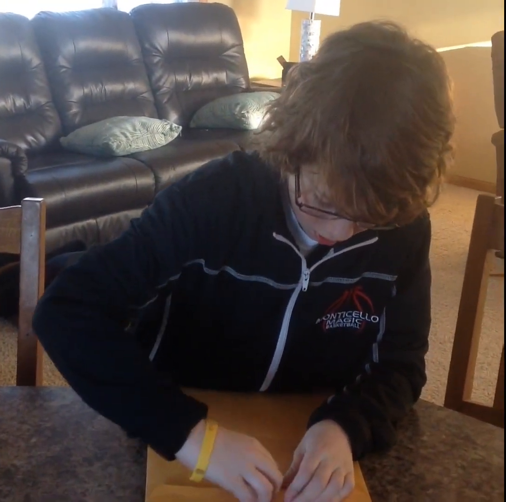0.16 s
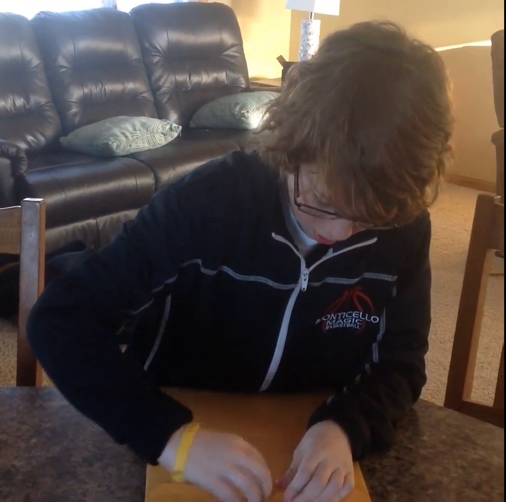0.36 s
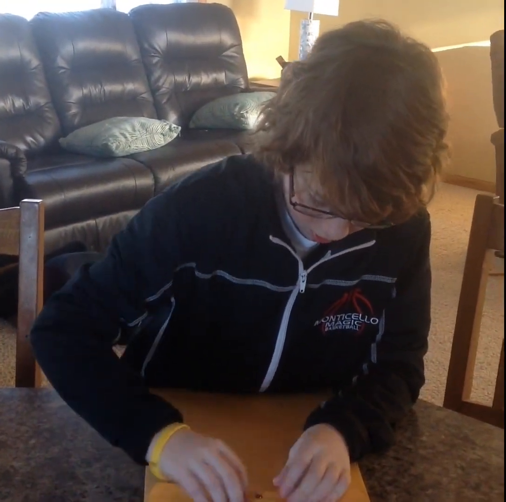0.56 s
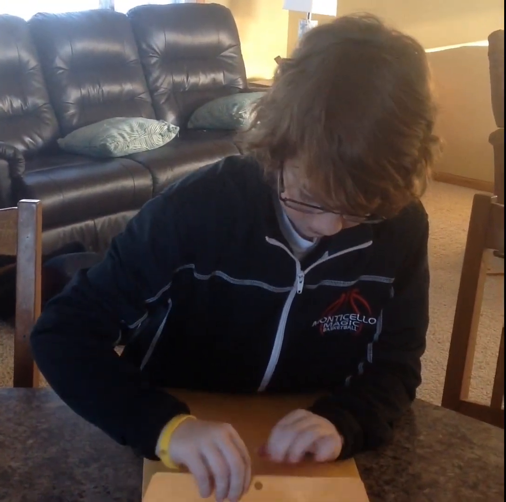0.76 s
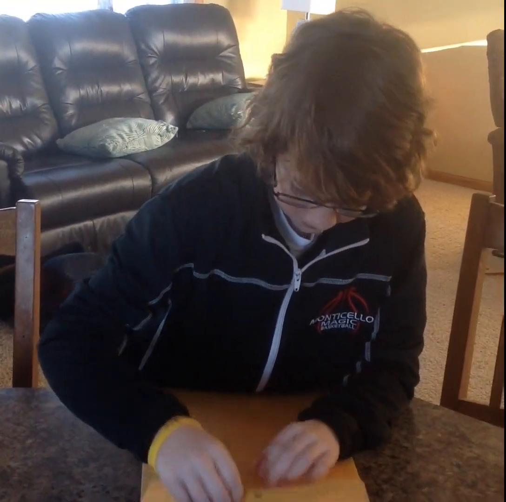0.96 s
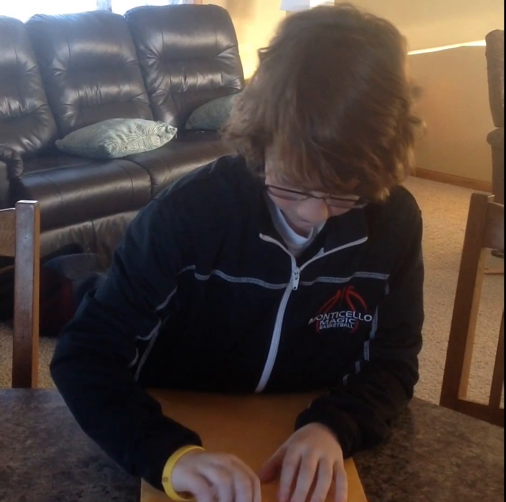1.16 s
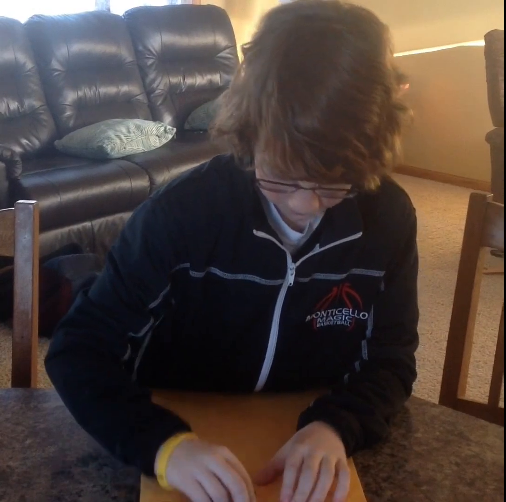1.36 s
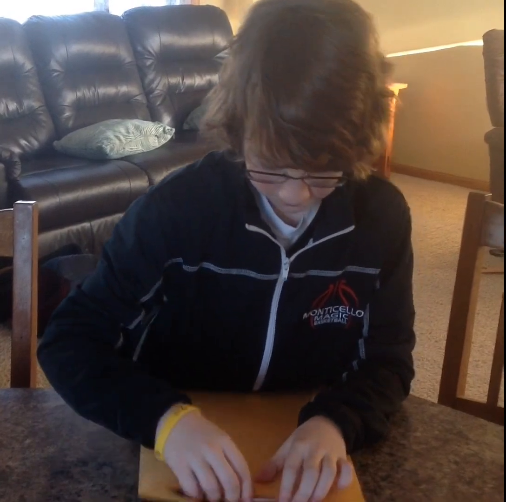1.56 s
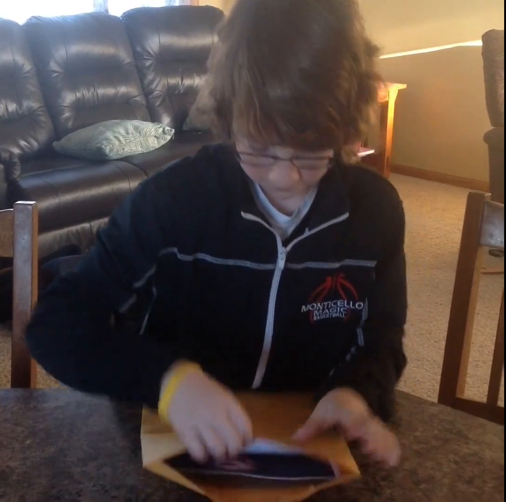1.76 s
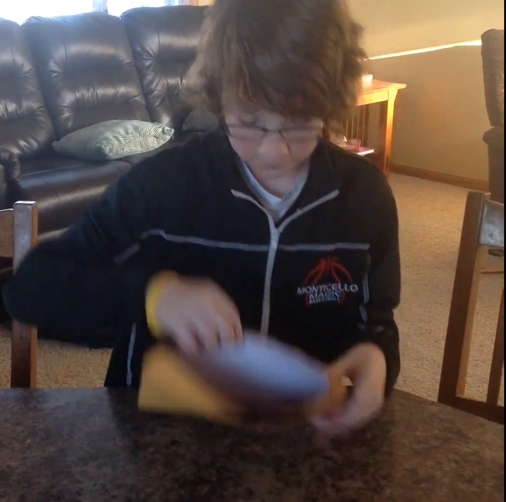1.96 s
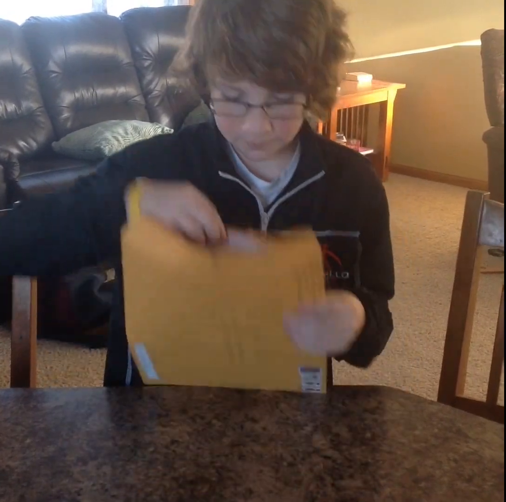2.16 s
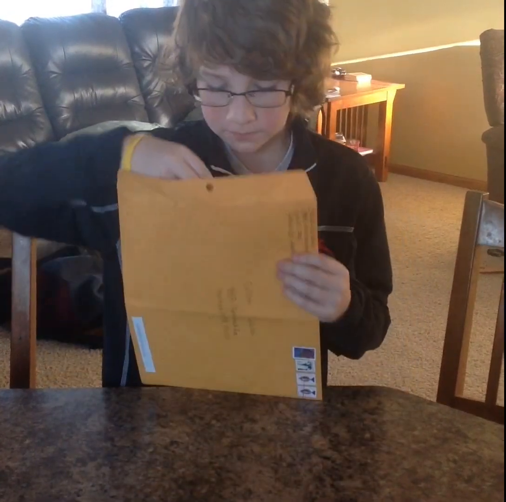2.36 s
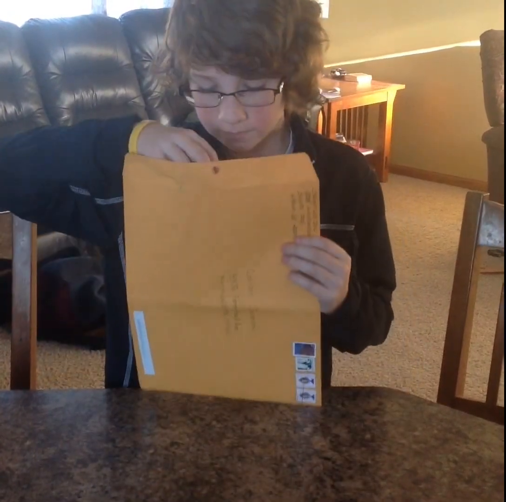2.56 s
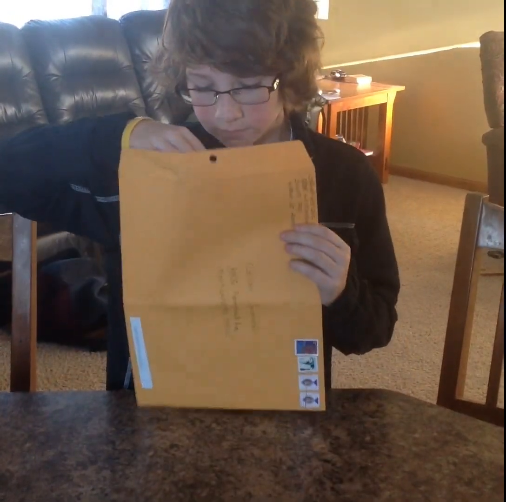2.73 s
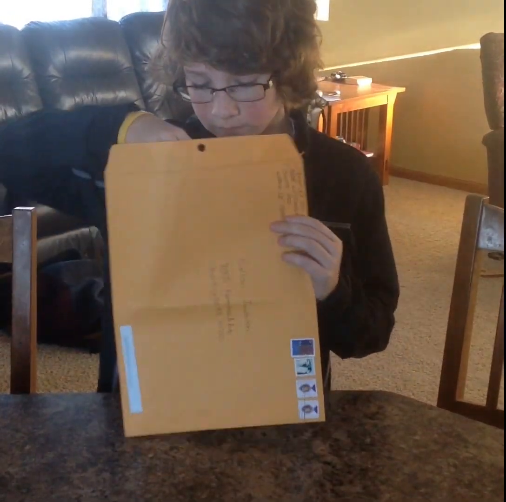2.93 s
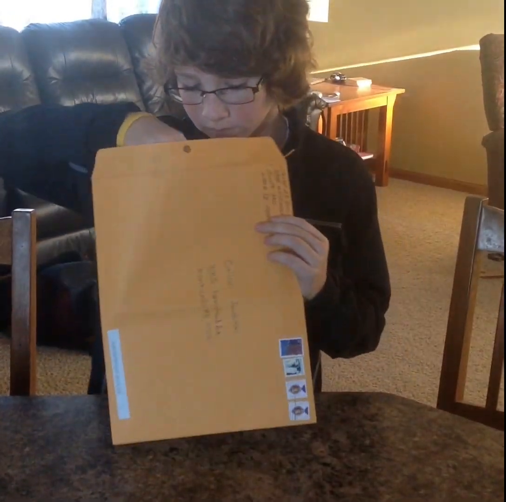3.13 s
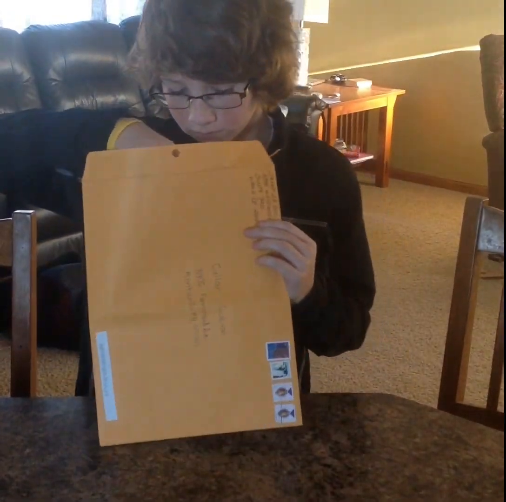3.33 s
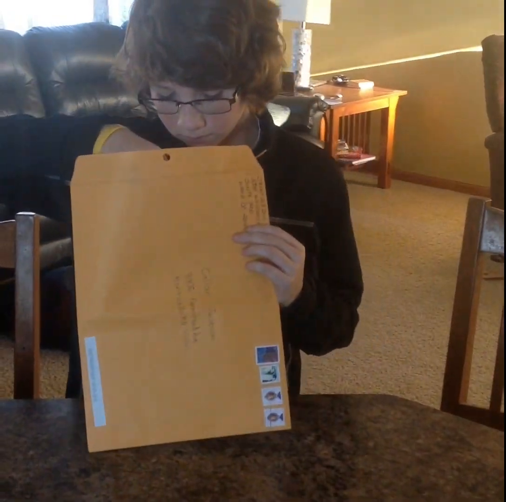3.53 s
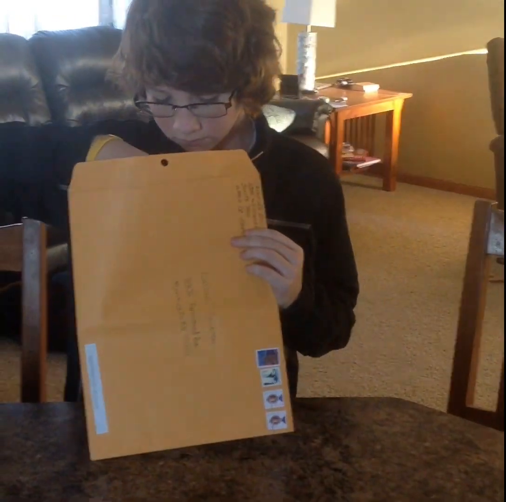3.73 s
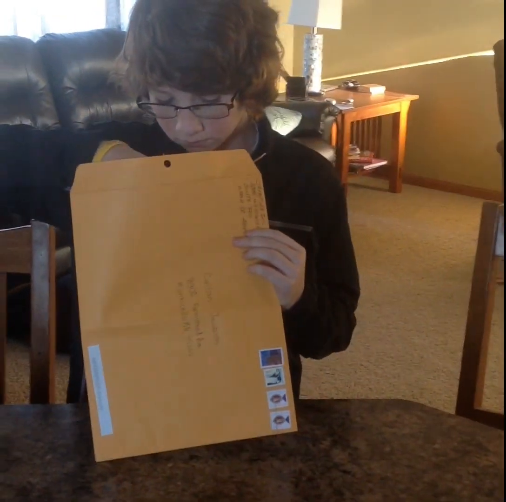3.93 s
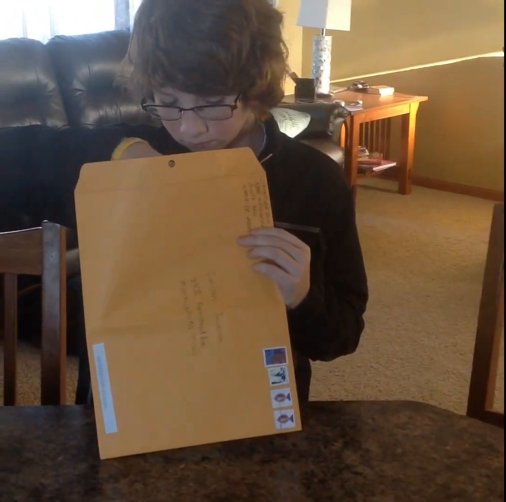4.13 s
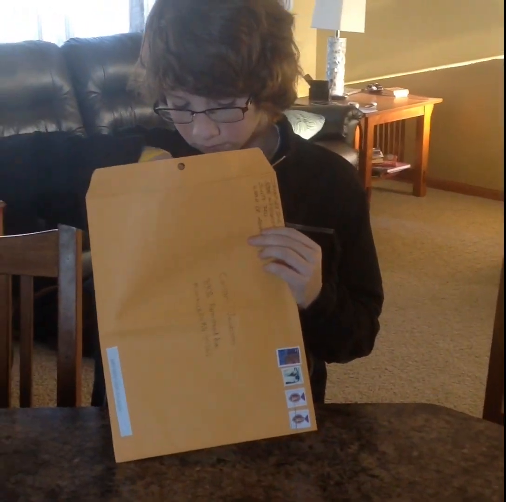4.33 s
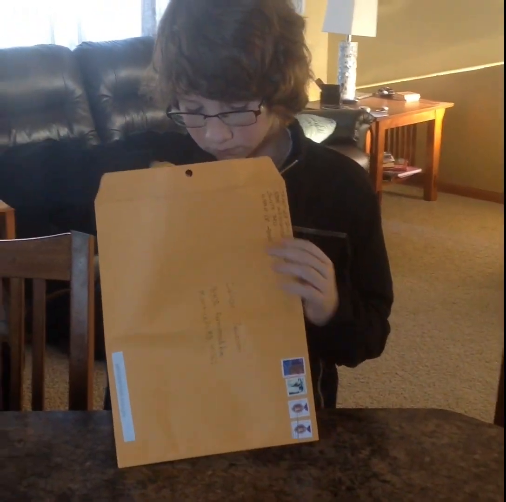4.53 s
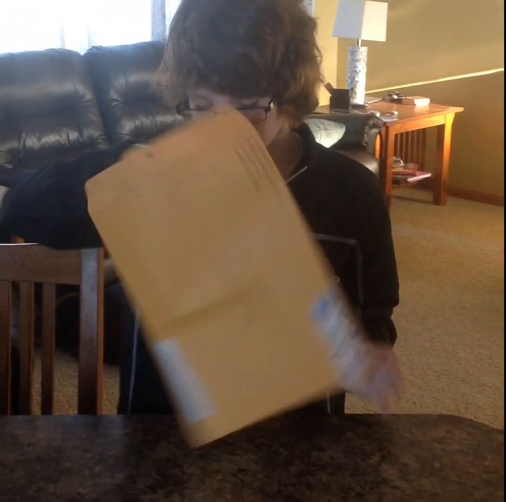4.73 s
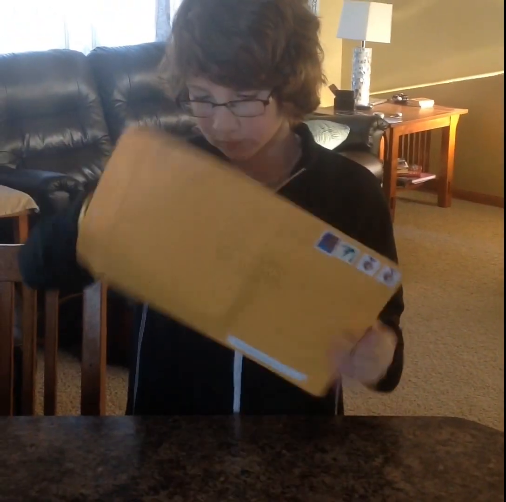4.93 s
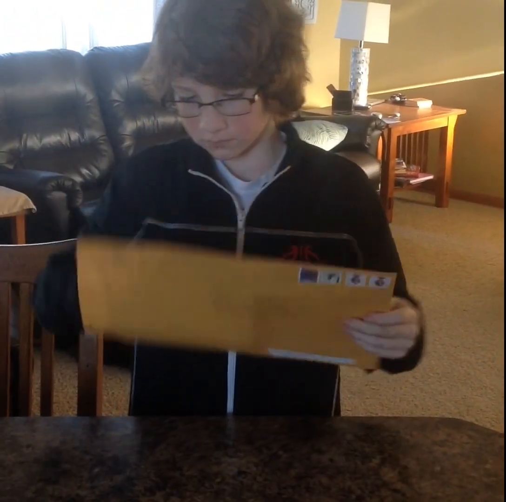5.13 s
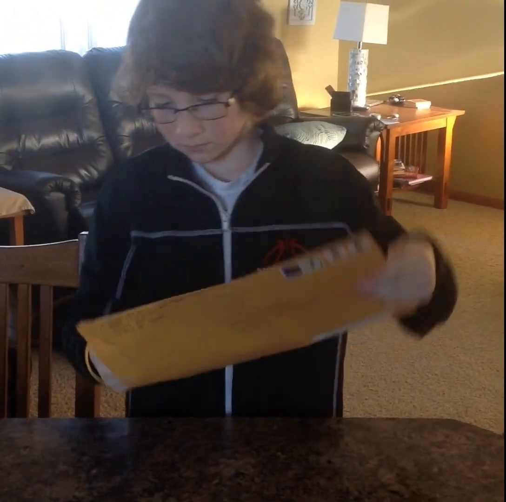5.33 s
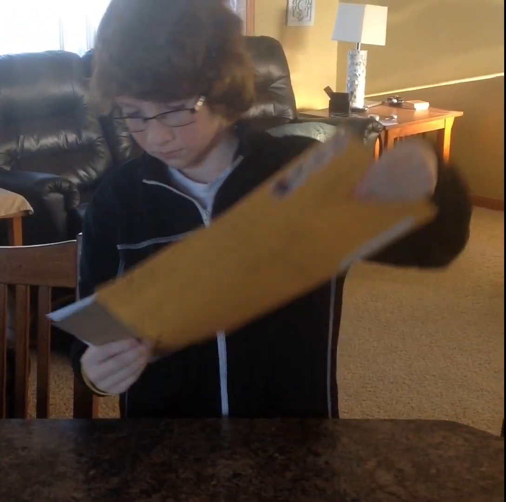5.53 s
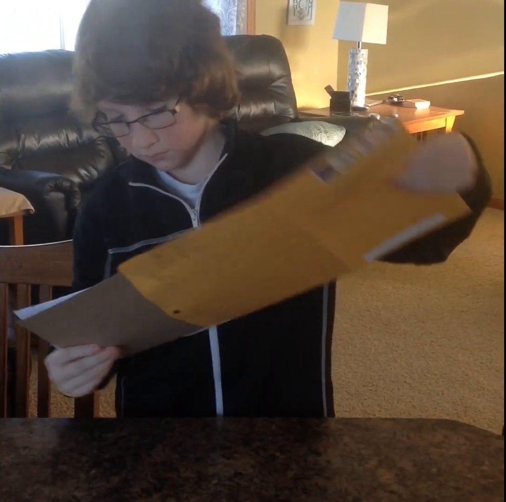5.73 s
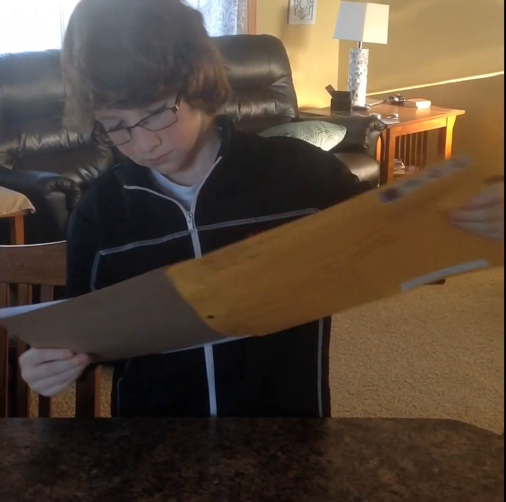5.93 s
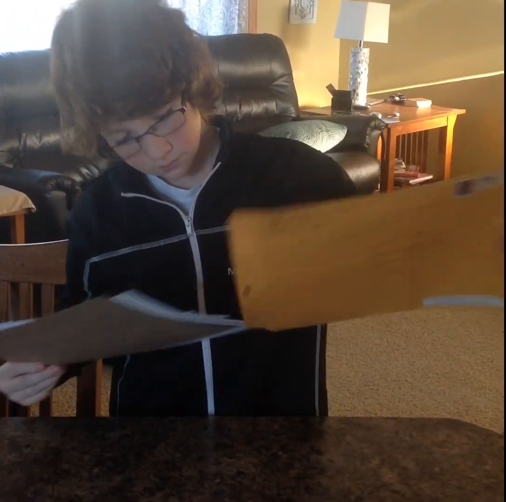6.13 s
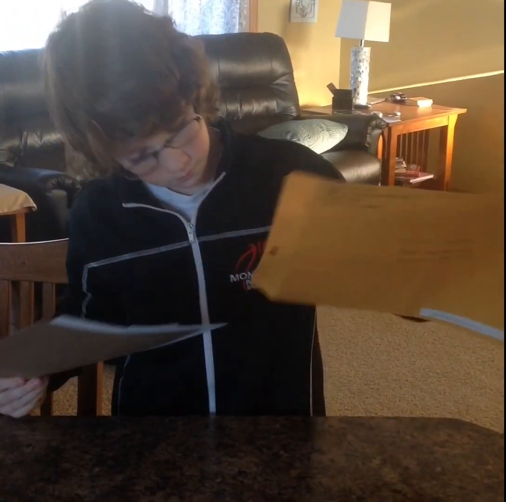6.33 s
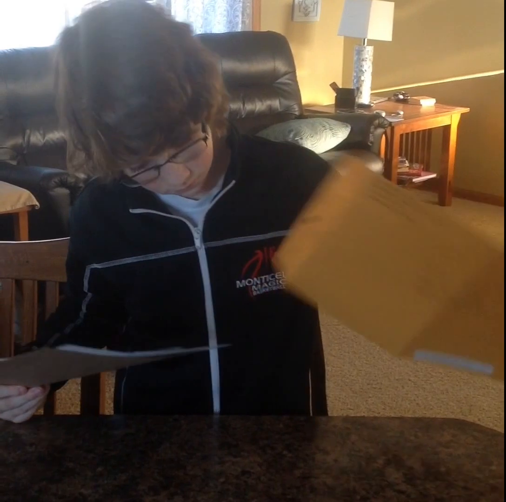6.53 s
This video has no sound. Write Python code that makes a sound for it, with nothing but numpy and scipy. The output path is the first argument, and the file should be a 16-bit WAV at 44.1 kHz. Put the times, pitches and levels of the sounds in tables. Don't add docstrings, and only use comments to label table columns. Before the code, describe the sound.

Close to a small mono microphone at a living-room table, fingers softly work a stiff paper envelope. The flap cracks open once, very loudly, near two seconds, followed by crisp crinkles and quieter rustling inside. After five seconds sheets slide out with a strong bright hiss, short squeaky rubs and tiny edge ticks. A clock tocks faintly every two seconds over a soft room hush.

```python
import sys
import numpy as np
from scipy import signal
from scipy.fft import rfft, irfft, next_fast_len
from scipy.io import wavfile
from scipy.ndimage import uniform_filter1d

SR = 44100
rng = np.random.default_rng(int(sys.argv[2]) if len(sys.argv) > 2 else 0)


def generate_wav(signal):
    frames = np.transpose(np.atleast_2d(signal))
    scaled = np.clip(frames, -1, 1) * 32767
    pcm = np.round(scaled).astype(np.int16)
    wavfile.write(sys.argv[1], SR, pcm)


def gain_from_db(level_db):
    decades = np.asarray(level_db, float) / 20
    return 10 ** decades


N = 290573

# (peak time [s], swell [s], fade [s], level [dB])
STROKES = [(.122, .03, .09, -73), (.44, 0.045, 0.08, -69), (.6, 0.022, .1, -66), (.69, .05, 0.081, -59),
           (.82, 0.056, 0.045, -52), (1.132, 0.033, 0.1, -60.5), (1.308, 0.074, 0.066, -58.5),
           (1.5, 0.058, 0.15, -55.5), (1.734, 0.063, 0.055, -60.5), (1.824, 0.026, 0.053, -60.5),
           (2.22, 0.13, 0.17, -59.5), (2.46, 0.062, 0.059, -56), (2.55, 0.032, 0.58, -56),
           (2.88, 0.24, 0.12, -52.5), (3.16, 0.19, 0.056, -60.5), (3.3, 0.079, 0.25, -60.5),
           (3.48, 0.042, 0.35, -66.5), (3.86, 0.41, .07, -61), (4.02, .3, 0.46, -65),
           (4.23, 0.075, 0.21, -55.5), (4.37, .15, 0.11, -59), (4.55, 0.071, 0.096, -64.5),
           (4.72, 0.058, 0.12, -51.5), (5.04, 0.018, 0.071, -54), (5.335, 0.074, 0.21, -44),
           (5.54, 0.075, 0.17, -41.5), (5.75, 0.24, 0.21, -45.5), (5.9, 0.067, 0.22, -46.5),
           (6.0, 0.067, .06, -51.5), (6.065, 0.056, 0.074, -49), (6.16, .1, 0.096, -56),
           (6.245, 0.11, .022, -54.5)]
# (peak time [s], swell [s], fade [s], level [dB])
BENDS = [(.122, 0.11, 0.096, -65.5), (.456, 0.024, 0.091, -61.5), (.594, 0.025, 0.076, -64),
         (.718, 0.038, 0.025, -59.5), (.822, 0.026, 0.027, -51), (.94, 0.023, 0.33, -65.5),
         (1.132, 0.076, 0.041, -55), (1.74, 0.018, .08, -55.5), (1.8, 0.29, 0.11, -61.5),
         (1.91, 0.15, 0.17, -56), (2.13, 0.32, 0.15, -57.5), (2.285, 0.016, 0.21, -48),
         (2.46, 0.13, 0.063, -50), (2.65, 0.22, 0.22, -50), (2.88, 0.041, 0.038, -50),
         (3.04, 0.008, 0.11, -50), (3.16, .15, 0.12, -71), (3.3, .2, 0.48, -68), (3.85, 0.22, 0.06, -63.5),
         (4.23, 0.042, 0.4, -56.5), (4.37, 0.51, 0.014, -57), (4.515, 0.018, 0.049, -55.5),
         (4.71, 0.051, 0.44, -60.5), (5.044, 0.01, 0.081, -52), (5.33, 0.098, 0.9, -59),
         (5.57, .05, 0.11, -47.5), (5.77, 0.027, 0.096, -48.5), (6.0, 0.018, 0.062, -47.5),
         (6.25, 0.0086, 0.044, -53.5), (6.59, 0.11, .1, -64)]
# (peak time [s], level [dB])
HEAVES = [(.05, -64), (.648, -66), (.93, -65), (1.5, -62), (1.82, -60), (2.27, -50), (2.65, -54.5),
          (3.04, -62), (3.19, -61), (4.2, -64), (4.508, -58.5), (4.62, -64), (4.87, -59), (5.06, -56.5),
          (6.0, -59), (6.16, -62), (6.59, -54.5)]
# (peak time [s], swell [s], fade [s], level [dB])
BRUSHES = [
    (1.3, 0.035, 0.077, -56),
    (1.505, 0.034, 0.022, -48.5),
    (1.58, 0.08, .05, -55.5),
    (4.89, 0.009, 0.08, -57.5),
    (5.21, .015, .035, -66),
    (5.625, 0.16, .02, -45),
    (6.06, 0.022, 0.034, -45),
]
# (frequency [Hz], density [dB/Hz])
SLIDE_SPECTRUM = [(710, -66), (1200, -4), (1290, -7.5), (3060, -3.0), (4260, -1.5), (6530, -1.0),
                  (8700, -3.5), (13800, -7.0), (15300, -9.0), (15500, -39.0)]
# (frequency [Hz], level [dB])
SCRAPE_SPECTRUM = [(1200, -21), (2000, 0), (2600, 2.5), (3300, 1.5), (4200, -4.5), (6500, -18.5)]
# (frequency [Hz], level [dB])
CRUMPLE_SPECTRUM = [(250, -3), (450, 4), (750, 7.5), (1250, 7), (1800, 7), (2800, -17)]
# (frequency [Hz], level [dB])
FLEX_SPECTRUM = [(70, -42), (120, -7.5), (185, -1), (320, -3), (420, -0.5), (700, -46)]
# (frequency [Hz], density [dB/Hz])
BRUSH_SPECTRUM = [(2500, -11), (6000, -0.5), (10000, 0.5), (15300, -4), (15500, -15)]
HEAVE_SWELL_S, HEAVE_FADE_S = 0.071, 0.084
REST_SLIDE_DB, REST_BEND_DB = -74, -73
SCRAPE_BY_SLIDE_DB, SCRAPE_BY_BEND_DB, FLEX_BY_BEND_DB = -6.5, -3.5, -6.5
MOVE_DROP_DB = 12
ROUNDING = 1.03
FLUTTER_DB = 1.1

# (time [s], peak [dB], panel [Hz], room share [dB])
DULL_SNAPS = [(.813, -39, 1230, -5.5), (.814, -47, 470, -17), (0.957, -50, 800, -13), (.829, -47, 900, -13),
              (.84, -53, 493, -12), (.861, -49, 1250, -2), (.872, -52, 1500, -10), (1.445, -56.5, 800, 1),
              (1.478, -51, 327, 0), (1.619, -53, 1250, -3), (1.821, -35, 740, -7), (.912, -55, 416, 5),
              (.935, -57, 570, -1), (1.187, -51, 333, 3), (1.205, -53, 330, 1.5), (1.835, -37, 776, -6),
              (1.8945, -36.5, 770, -2), (2.211, -38.5, 665, -0.5), (2.311, -35.5, 1180, 4),
              (3.257, -48, 447, 1), (3.451, -51.5, 750, -16), (4.25, -44, 440, -7), (4.532, -38, 1270, -5),
              (4.553, -45, 1510, -3), (6.243, -44, 1120, -6), (6.364, -50.5, 345, -8),
              (6.548, -48, 355, -2)]
# (time [s], peak [dB], low panel [Hz], high panel [Hz],
# room share [dB])
FOLDS = [(.12, -43.5, 880, 1390, -4), (.823, -50, 900, 1780, -14), (1.0675, -38, 776, 1530, -14),
         (1.079, -46, 570, 1600, -15), (1.138, -43, 664, 2480, -6), (1.727, -41, 1080, 2820, -6),
         (1.76, -42, 600, 1500, -2), (1.776, -42, 1190, 2700, -4), (2.649, -38, 423, 2160, -2),
         (2.867, -37.5, 1313, 1900, 1), (3.038, -31, 1150, 2450, -10), (3.043, -36, 1820, 4020, -3),
         (3.051, -38, 440, 2320, -5), (3.057, -42, 635, 1200, -6), (3.088, -46, 800, 2020, -11),
         (3.158, -44.5, 794, 1590, -1.5),
         (4.228, -44, 343, 1300, -1), (4.285, -40, 1180, 2000, -4), (4.289, -36, 500, 1900, -10),
                 (4.294, -38, 1300, 2800, -9), (4.299, -37, 593, 2850, -9), (4.303, -34.5, 1230, 1600, -10),
                 (4.498, -38, 743, 1490, -6), (4.891, -45.5, 750, 1430, -2), (4.951, -46, 440, 1220, -3.5),
                 (4.972, -43.5, 1110, 1390, -5), (5.035, -44, 640, 1750, 0), (5.109, -45.5, 330, 1710, -8),
                 (5.563, -41.5, 356, 2460, 3.5), (5.589, -37, 450, 3000, -4),
                 (5.757, -33.5, 1060, 3060, -13), (5.985, -32.5, 1295, 1900, -6),
                 (6.054, -42, 800, 3530, 0.5)]
# (time [s], peak [dB], low panel [Hz], high panel [Hz], room share [dB])
RUNNING_FOLDS = [(0.1203, -51, 1300, 2900, -1), (1.0735, -39, 750, 1580, -13), (1.0835, -41, 640, 1500, -9),
                 (1.092, -50, 600, 1400, -8), (1.115, -48, 1500, 1650, -13), (1.733, -41, 1100, 2870, -8),
                 (1.772, -41, 1200, 2700, -8), (1.786, -46, 1600, 1800, -10),
                 (1.845, -38.5, 1070, 1360, 0.5), (1.923, -37, 647, 1100, -9), (1.928, -43, 700, 1410, -16),
                 (2.355, -37, 447, 3300, -4), (2.362, -46, 1000, 2600, -10), (4.249, -50, 1210, 1900, -12),
                 (4.309, -37.5, 1250, 1900, -7), (4.329, -41, 1600, 1700, -6), (4.961, -42, 1150, 1600, -3),
                 (5.052, -46.5, 400, 1190, -8), (5.118, -55, 450, 1730, -12), (5.992, -49, 500, 1520, -8)]
# (time [s], peak [dB], low panel [Hz], high panel [Hz], room share [dB])
SHARP_SNAPS = [(.59, -51, 848, 2920, -6), (.717, -41, 398, 1820, -10), (1.822, -43, 1500, 3700, -3),
               (0.743, -55, 500, 1830, 4), (0.765, -49, 1132, 1900, 6), (1.0681, -38, 1270, 2980, -1),
               (1.079, -48, 1400, 3200, -3), (1.132, -45, 1300, 3000, -6), (2.275, -29, 1150, 2640, -8),
               (2.276, -34, 930, 5000, -0.5), (2.2825, -26, 840, 2760, -12),
               (2.2889, -31.5, 1000, 2720, -7), (2.299, -38, 1200, 4900, -10), (2.311, -38, 1120, 3260, -4),
               (2.341, -29.5, 910, 3300, -10), (2.449, -33, 1200, 2390, -16), (2.454, -34, 1500, 2800, -9),
               (2.3344, -24.5, 700, 2390, -9), (2.347, -31, 430, 3060, -2.5),
               (2.4434, -23.5, 1430, 2620, -8), (2.4428, -28, 2010, 3300, -3), (2.82, -41, 1389, 3080, 5.5),
               (5.044, -44, 580, 3000, -2)]
DULL_HIGH_HZ = 1900
DULL_HIGH_DB, FOLD_HIGH_DB, SHARP_HIGH_DB = -34, -8.5, 4
BUCKLE_S = .0009

# (time [s], peak [dB], tearing length [ms], tearing [dB], room share [dB])
CRACKS = [
    (1.9312, -16.5, 1.5, -2, 10),
    (1.9321, -13, 1.2, -16, -15),
    (1.9374, -6.5, 3, -18.5, -10.5),
    (1.9441, -8.5, 2.1, -10, -18),
    (1.9535, -31, 2.8, -16, -16),
]
# (frequency [Hz], density [dB/Hz])
FLAP_SPECTRUM = [(71, -53), (120, -63), (180, -4.5), (259, -27), (366, -11), (970, -7.5), (1120, -6),
                 (1500, -6), (3300, -3), (12500, -16.5), (15300, -32)]
# (frequency [Hz], level [dB], t60 [s])
TABLE_MODES = [(184, -38, 0.33), (638, -38.5, 0.27), (686, -28, 0.07), (830, -21, 0.037)]
TABLE_S = 1.932

# (start [s], length [s], frequency [Hz], width [Hz], level [dB])
DRAGS = [
    (5.259, 0.42, 2720, 1300, -58),
    (1.461, 0.18, 3300, 900, -62),
    (4.531, 0.039, 1550, 300, -56),
    (4.698, 0.25, 3040, 900, -61),
    (5.749, 0.14, 3240, 350, -49),
    (6.229, 0.057, 2440, 205, -56),
]
# (start [s], length [s], from [Hz], to [Hz], level [dB])
GLIDES = [
    (1.47, 0.073, 5770, 6300, -62),
    (0.84, .04, 1296, 1690, -60),
    (5.33, 0.043, 4600, 4760, -59),
    (5.489, 0.086, 3700, 3210, -52),
    (5.55, .04, 2340, 2660, -50),
    (5.568, 0.046, 2900, 3240, -54),
    (5.607, .04, 3190, 3300, -45),
    (5.835, .12, 3500, 5330, -56),
    (6.05, 0.022, 7800, 7900, -57),
]
# (time [s], peak [dB], frequency [Hz], width [Hz])
TICKS = [(1.418, -41, 13000, 3500), (5.0225, -21, 8400, 9000), (5.509, -29, 13000, 3000),
         (5.5105, -33, 13500, 2500), (5.5118, -31, 12500, 2500), (5.513, -33, 13800, 2500),
         (5.5145, -33, 13000, 2500), (5.517, -32, 13500, 2500), (5.52, -32, 14000, 2500),
         (5.524, -28, 12500, 3500), (5.5275, -33, 13500, 2500), (5.532, -32, 13500, 2500),
         (5.5413, -22, 13500, 3000), (5.553, -31, 11000, 5000), (5.562, -28, 11000, 5000)]
GLIDE_WIDTH = 0.11

# (time [s], peak [dB], frequency [Hz])
THUMPS = [(1.294, -35.5, 230), (1.935, -44, 185), (2.647, -42, 200), (2.662, -39, 190), (2.68, -43, 190),
          (2.352, -38, 420), (5.988, -38, 290), (6.006, -40, 280), (6.45, -46, 140), (2.52, -46, 190),
          (2.6, -45, 190)]
# (time [s], peak [dB])
TOCKS = [
    (.4585, -38.5),
    (2.4585, -42),
    (4.4583, -36.5),
    (6.458, -36.5),
]
# (frequency [Hz], level [dB], t60 [s])
CASE_MODES = [(750, 14, 0.027), (800, -5, .08), (1150, -11, 0.1), (1736, 5.5, 0.028), (1780, -9, .12),
              (3300, -10.5, 0.054), (7900, -26, .012)]
# (frequency [Hz], density [dB/Hz])
CLICK_SPECTRUM = [(300, -20), (1000, 3), (3300, -1.5), (6500, 3), (15000, -13)]
TICK_DB, TICK_S = -13, .006
# (time [s], pitch [Hz], level [dB])
CHIRPS = [
    [(0, 15200, -78), (.02, 15250, -68), (.07, 15250, -78), (.09, 15200, -84)],
    [(.16, 15000, -84), (.19, 15400, -74), (.225, 15200, -74), (.25, 14700, -68), (.28, 14500, -74),
     (.29, 14500, -86)],
    [(.23, 12300, -78), (.26, 12200, -74), (.285, 12100, -77), (.31, 11400, -80)],
    [(.35, 14650, -84), (.385, 14600, -77), (.41, 14600, -78), (.432, 14400, -72), (.448, 13400, -80)],
]

# (frequency [Hz], t60 [s])
ROOM_T60 = [(150, 0.58), (400, 0.67), (1000, 0.56), (2800, 0.52), (7300, 0.43), (13000, 0.17)]
# (frequency [Hz], density [dB/Hz])
HUSH_SPECTRUM = [(15, -57), (25, -32), (50, -75), (100, -10.5), (165, 3), (280, 3), (570, -6.5),
                 (780, -1.5), (1050, -13), (1900, -6.5), (3000, -13), (11400, -16.5), (15500, -20.5)]
# (frequency [Hz], spread [dB])
HUSH_PATCHES = [(300, 1.7), (900, 3.5), (3000, 2.5)]
HUSH_DB = -62
MIC_CUT_HZ, EDGE_HZ = 167, 15330
LOPSIDED = 0.098


def evened(x):
    return x / np.sqrt(np.mean(x ** 2) + 1e-20)


def peaked(db, sound):
    return gain_from_db(db) * sound / abs(sound).max()


def like(sound, other):
    return other * np.linalg.norm(sound) / np.linalg.norm(other)


def read(points, hz):
    f, value = np.transpose(points)
    return np.interp(np.log(hz + 1), np.log(f + 1), value)


def coloured(x, points):
    size = next_fast_len(len(x))
    gain = gain_from_db(read(points, np.fft.rfftfreq(size, 1 / SR)))
    return evened(irfft(rfft(x, size) * gain, size)[:len(x)])


def ring(x, hz, width_hz):
    return signal.lfilter(*signal.iirpeak(min(hz, 18000), max(hz / width_hz, .3), SR), x)


def modes(table, t):
    return sum(gain_from_db(db - 60 * t / t60) * np.sin(2 * np.pi * hz * t) for hz, db, t60 in table)


def add(mix, s, sound):
    part = mix[round(s * SR):][:len(sound)]
    part += sound[:len(part)]


def grains(per_s, spread_db, clump_db, clump_ms):
    size = gain_from_db(spread_db * np.minimum(rng.exponential(1, N), 3.5)) * rng.standard_normal(N)
    span = int(clump_ms * SR / 1000)
    clumps = evened(uniform_filter1d(uniform_filter1d(rng.standard_normal(N), span), span))
    return size * (rng.random(N) < per_s / SR) * gain_from_db(clump_db * clumps)


def effort(moves, rest_db=-120):
    t = np.arange(0, N + 32, 32) / SR
    power = gain_from_db(2 * rest_db)
    for s, swell_s, fade_s, db in moves:
        away = np.maximum((s - t) / swell_s, (t - s) / fade_s)
        power = power + gain_from_db(2 * (db - MOVE_DROP_DB * away ** ROUNDING))
    return np.interp(np.arange(N) / SR, t, power)


def rustle():
    slide = coloured(grains(15000, 1.3, .5, 8), SLIDE_SPECTRUM)
    scrape = coloured(grains(6000, 1.8, .9, 8), SCRAPE_SPECTRUM)
    crumple = coloured(grains(4000, 2.2, 1.2, 12), CRUMPLE_SPECTRUM)
    flex = coloured(grains(2500, 1.8, 1.1, 25), FLEX_SPECTRUM)
    brush = coloured(grains(15000, 1.3, .5, 8), BRUSH_SPECTRUM)
    sliding = effort(STROKES, REST_SLIDE_DB)
    bending = effort(BENDS, REST_BEND_DB)
    heaving = effort([(s, HEAVE_SWELL_S, HEAVE_FADE_S, db) for s, db in HEAVES])
    scraping = gain_from_db(2 * SCRAPE_BY_SLIDE_DB) * sliding + gain_from_db(2 * SCRAPE_BY_BEND_DB) * bending
    flexing = heaving + gain_from_db(2 * FLEX_BY_BEND_DB) * bending
    out = np.sqrt(sliding) * slide + np.sqrt(scraping) * scrape
    out += np.sqrt(bending) * crumple + np.sqrt(flexing) * flex
    return out + np.sqrt(effort(BRUSHES)) * brush


def fluttered(x):
    z = signal.stft(x, nperseg=256)[2]
    patches = evened(uniform_filter1d(uniform_filter1d(rng.standard_normal(z.shape), 4, 0), 9, 1))
    gain = gain_from_db(FLUTTER_DB * patches - 0.13 * FLUTTER_DB ** 2)
    return signal.istft(z * gain, nperseg=256)[1][:N]


def creases():
    rows = [(s, db, hz, DULL_HIGH_HZ, DULL_HIGH_DB, wet_db) for s, db, hz, wet_db in DULL_SNAPS]
    folds = FOLDS + RUNNING_FOLDS
    rows += [(*row, FOLD_HIGH_DB, wet_db) for *row, wet_db in folds]
    return rows + [(*row, SHARP_HIGH_DB, wet_db) for *row, wet_db in SHARP_SNAPS]


def panels(x, low_hz, high_hz, high_db):
    bands = [(low_hz, 0.58 * low_hz, 0), (1300, 2000, -7),
             (high_hz, 0.43 * high_hz, high_db + 6.0), (6500, 6000, high_db - 15.0)]
    out = 0
    for hz, width_hz, db in bands:
        rung = ring(ring(ring(x, hz, width_hz), hz, width_hz), hz, width_hz)
        out = out + gain_from_db(db) * rung / np.sqrt(width_hz)
    return out


def snap(db, *shape):
    t = np.arange(2600) / SR
    size, chance = rng.standard_normal(len(t)), rng.random(len(t))
    burst = size * (chance < .15) * np.exp(-t / 0.0056)
    burst[[0, round(BUCKLE_S * SR)]] = 1.4, 3.1
    sound = peaked(db, panels(burst, *shape))
    return sound, like(sound, panels(signal.unit_impulse(len(t)), *shape))


def crack(db, tear_ms, tear_db):
    t = (np.arange(2048) - 256) / SR
    slip = signal.unit_impulse(len(t), 256)
    decay = np.exp(-np.where(t < 0, -t / 0.00037, t * 1000 / tear_ms))
    tear = gain_from_db(tear_db) * rng.standard_normal(len(t)) * decay
    sound = peaked(db, coloured(slip + tear, FLAP_SPECTRUM))
    return sound, like(sound, coloured(slip, FLAP_SPECTRUM))


def table():
    t = np.arange(20000) / SR
    return modes(TABLE_MODES, t) * np.minimum(t / 0.0044, 1)


def drag(length_s, hz, width_hz, db):
    t = np.linspace(0, 1, int(length_s * SR))
    tone = ring(ring(rng.standard_normal(len(t)), hz, width_hz), hz, width_hz)
    return gain_from_db(db) * evened(tone) * np.minimum(t / 0.027, 1) * (1 - t ** 2)


def glide(length_s, from_hz, to_hz, db):
    t = np.linspace(0, 1, int(length_s * SR))
    low = signal.butter(2, GLIDE_WIDTH * from_hz / 2, fs=SR, output="sos")
    waver = signal.sosfilt(low, rng.standard_normal((2, len(t))))
    phase = 2 * np.pi * np.cumsum(from_hz + (to_hz - from_hz) * t) / SR
    tone = waver[0] * np.cos(phase) + waver[1] * np.sin(phase)
    return gain_from_db(db) * evened(tone) * np.sin(np.pi * t) ** 0.7


def tick(db, hz, width_hz):
    return peaked(db, ring(ring(signal.unit_impulse(200), hz, width_hz), hz, width_hz))


def thump(db, hz):
    t = np.arange(3000) / SR
    return gain_from_db(db) * np.sin(2 * np.pi * hz * t) * (t / 0.0053) * np.exp(1 - t / 0.0026)


def tock(db):
    t = np.arange(5000) / SR
    case = modes(CASE_MODES, t) * np.minimum(t / 0.0053, 1) ** 2
    click = gain_from_db(TICK_DB) * coloured(rng.standard_normal(len(t)), CLICK_SPECTRUM) * np.exp(-t / TICK_S)
    return peaked(db, case + click)


def chirp(rows):
    s, hz, db = np.transpose(rows)
    t = np.arange(s[0], s[-1], 1 / SR)
    tone = np.sqrt(2) * np.sin(2 * np.pi * np.cumsum(np.interp(t, s, hz)) / SR)
    return s[0], tone * gain_from_db(np.interp(t, s, db)) * signal.windows.tukey(len(t), .2)


def room(x):
    out, turn = np.zeros(N), np.arange(N) / SR * 2.302
    for k in range(3):
        taps = np.zeros(SR)
        at = np.arange(130, SR - 20, 20)
        taps[at + rng.integers(0, 20, len(at))] = rng.choice([-1., 1.], len(at))
        hz, t, z = signal.stft(taps, SR, nperseg=256)
        decay = gain_from_db(-60 * t / read(ROOM_T60, hz)[:, None])
        tail = signal.istft(z * decay, SR, nperseg=256)[1]
        share = np.sqrt(2 / 3) * np.cos(np.pi * (turn + k / 3))
        out += signal.oaconvolve(x * share, tail / np.linalg.norm(tail))[:N]
    return out


def hush():
    frames, hz = N // 256 + 5, np.fft.rfftfreq(1024, 1 / SR)
    a, b, patches = rng.standard_normal((frames, 513, 3)).T
    patches = evened(uniform_filter1d(uniform_filter1d(patches, 10, 0), 12, 1))
    level_db = read(HUSH_SPECTRUM, hz)[:, None] + read(HUSH_PATCHES, hz)[:, None] * patches
    noise = signal.istft((a + 1j * b) * gain_from_db(level_db), nperseg=1024, noverlap=768)[1][:N]
    return gain_from_db(HUSH_DB) * evened(noise)


def scene():
    near = fluttered(rustle())
    sent = gain_from_db(-10.5) * near
    # time, direct sound, diffuse sound, room share dB
    hits = [(s, *snap(*row), wet_db) for s, *row, wet_db in creases()]
    hits += [(s - 256 / SR, *crack(*row), wet_db) for s, *row, wet_db in CRACKS]
    hits += [(s, tick(*row), tick(*row), -12) for s, *row in TICKS]
    hits += [(s, thump(*row), thump(*row), -18) for s, *row in THUMPS]
    hits += [(s, tock(db), tock(db), -10) for s, db in TOCKS]
    for s, direct, diffuse, wet_db in hits:
        add(near, s, direct)
        add(sent, s, gain_from_db(wet_db) * diffuse)
    add(near, TABLE_S, table())
    for s, *row in DRAGS:
        add(near, s, drag(*row))
    for s, *row in GLIDES:
        add(near, s, glide(*row))
    for rows in CHIRPS:
        add(near, *chirp(rows))
    low_cut = signal.butter(2, MIC_CUT_HZ, "high", fs=SR, output="sos")
    return np.tile(signal.sosfilt(low_cut, near + room(sent)) + hush(), (2, 1))


def band_limit(x):
    return signal.sosfilt(signal.butter(12, 16460, fs=SR, output="sos"), x)


def record(dry):
    bent = dry + LOPSIDED * dry ** 2
    low_pass = signal.firwin(511, EDGE_HZ, window=("kaiser", 7), fs=SR)
    limited = signal.oaconvolve(bent, low_pass[None], "same")
    return band_limit(limited)


dry = scene()
out = record(dry)
generate_wav(out)
```